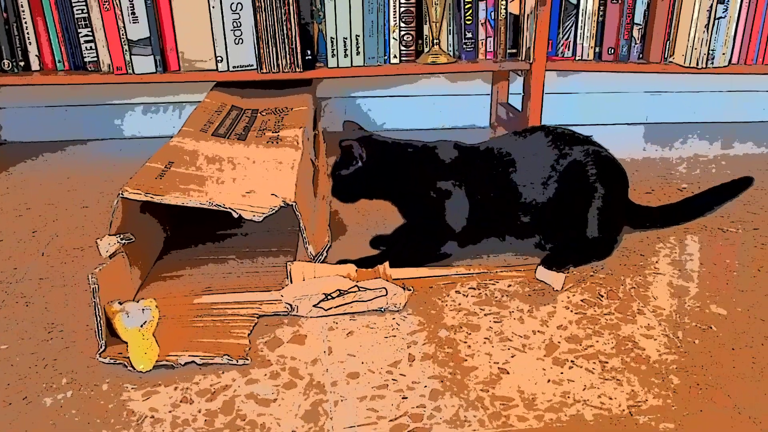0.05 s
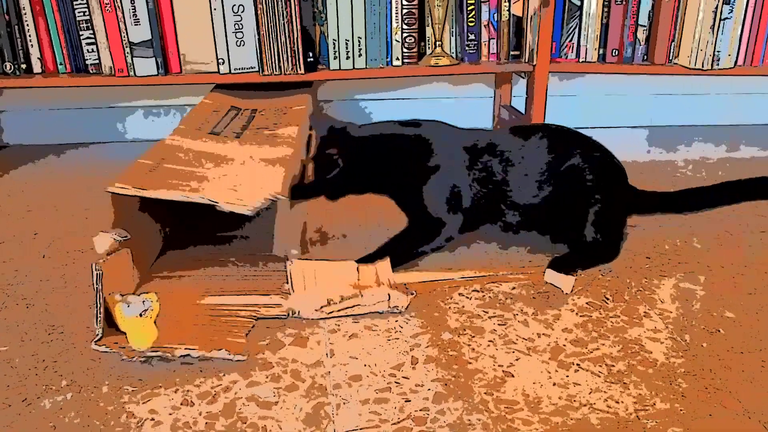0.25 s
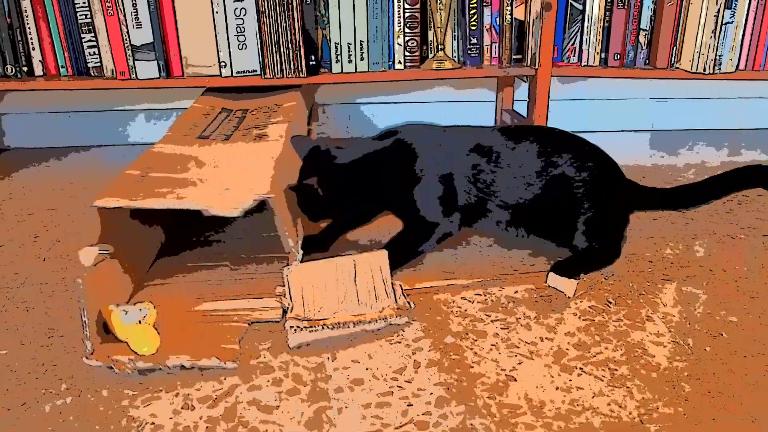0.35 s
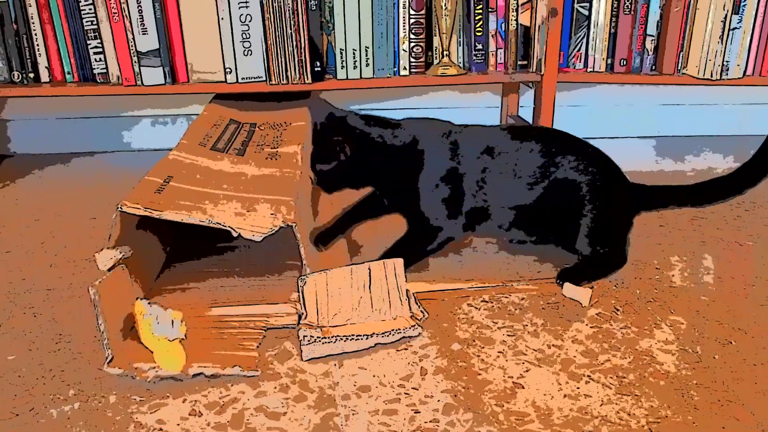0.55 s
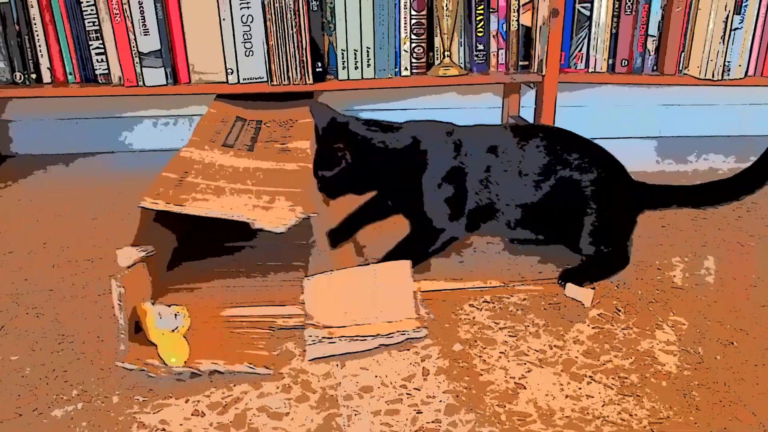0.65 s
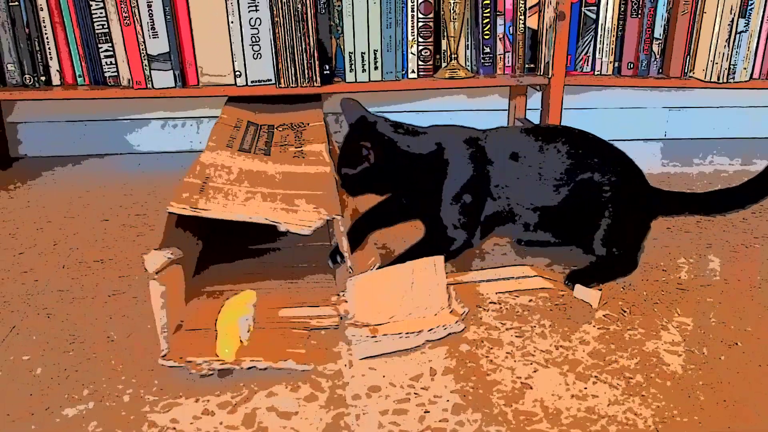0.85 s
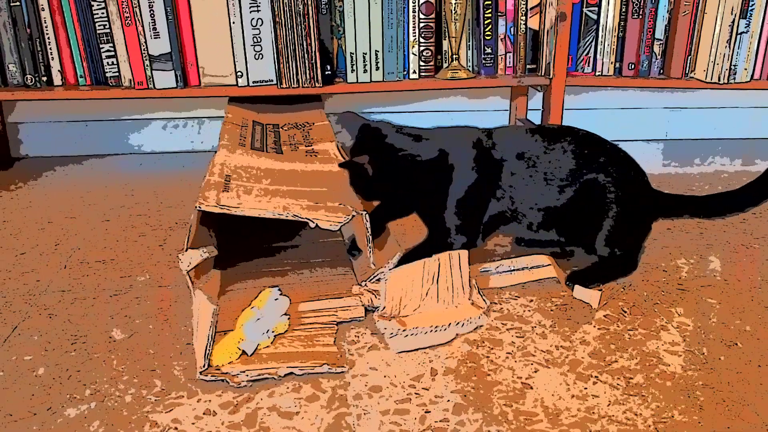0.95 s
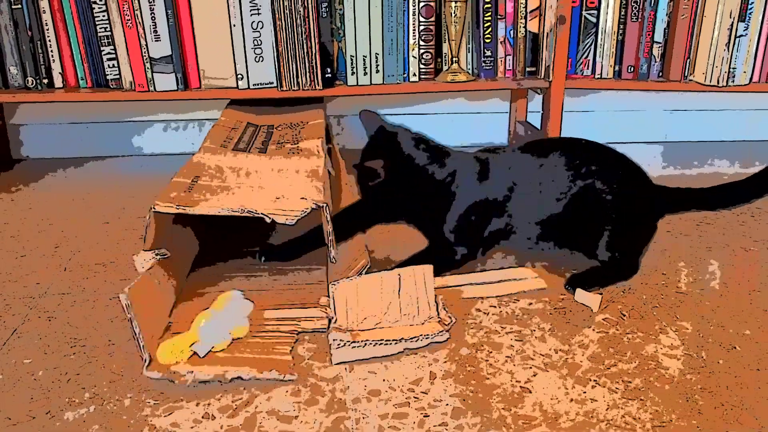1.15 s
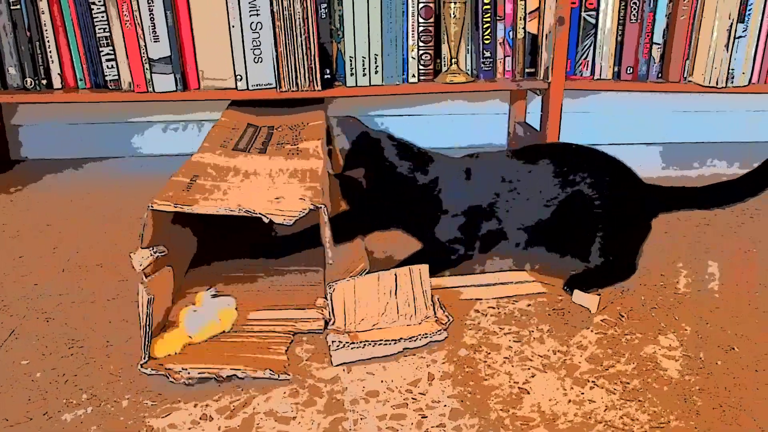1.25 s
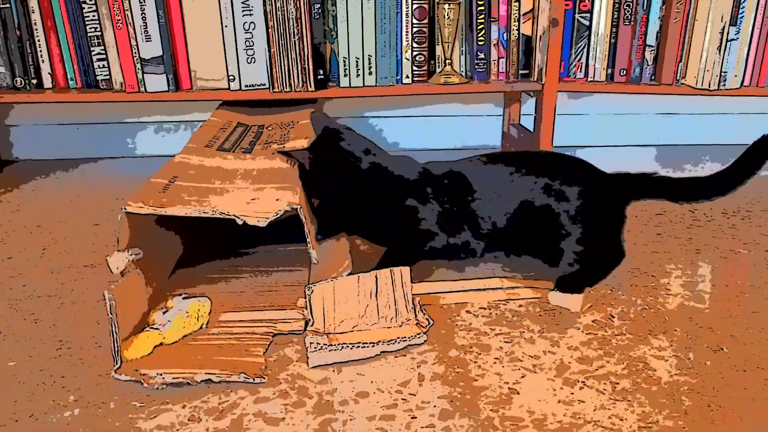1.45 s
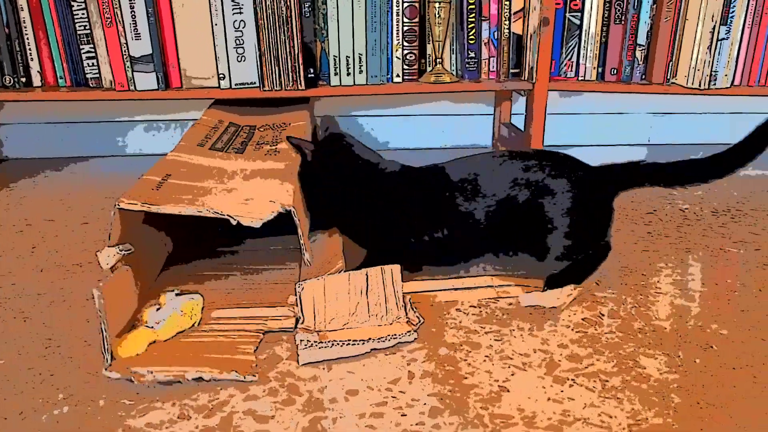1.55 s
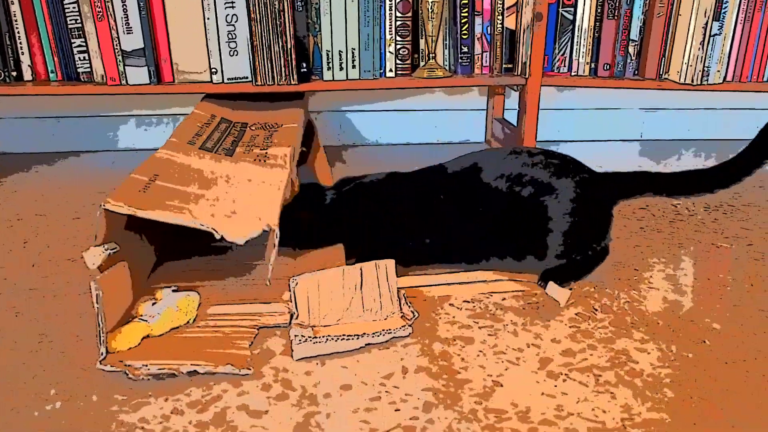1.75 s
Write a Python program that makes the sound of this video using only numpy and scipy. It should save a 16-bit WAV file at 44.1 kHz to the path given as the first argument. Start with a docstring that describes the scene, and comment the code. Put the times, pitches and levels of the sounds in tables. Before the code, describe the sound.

Cardboard scrapes and crackles as a cat shoulders into a box. Sharp snaps and crinkling come first, then hollow bumps, a loud flap clack and lighter scratching, heard close by in a small carpeted room with a faint hum.

```python
"""A small carpeted room, where a cat shoulders into a cardboard box.
Fur and cardboard scrape, the box drags, and a crease gives in sharp snaps and fine crinkling.
Paws and shoulders bump the hollow box, the floor thuds, flaps spring back with a clack,
and paw strokes make the cardboard sing. Under it all lie a low hum and the air of the room."""
import sys
import numpy as np
from scipy import signal
from scipy.fft import rfft, irfft, next_fast_len
from scipy.io import wavfile
from scipy.ndimage import uniform_filter1d, map_coordinates

SR = 44100
rng = np.random.default_rng(int(sys.argv[2]) if len(sys.argv) > 2 else 0)


def transcribe(u):
    """Save the signal u as a 16-bit wav file named by the first command-line argument.

    u: samples, shape (n,) or (channels, n), limited to [-1, 1]; the rate is SR.
    q: integer samples, one column per channel.
    """
    v = np.clip(np.atleast_2d(u).T, -1, 1)
    q = np.round(v * 32767).astype(np.int16)
    wavfile.write(sys.argv[1], SR, q)


N = 79380
T = np.arange(N) / SR


def amp(db):
    """Decibels to gain."""
    return 10 ** (np.asarray(db) / 20)


def unit(x):
    """Scale to rms 1."""
    return x / np.sqrt(np.mean(x ** 2) + 1e-20)


def along(points, hz):
    """(f/Hz, value) points read on a log axis."""
    f, v = np.transpose(points)
    return np.interp(np.log(hz + 1), np.log(f + 1), v)


def level(points):
    """Gain per sample from (t/s, level/dB) points."""
    return amp(np.interp(T, *np.transpose(points)))


def wobble(knots_per_s):
    """Smooth random curve."""
    return map_coordinates(rng.standard_normal(int(N * knots_per_s / SR) + 4), [T * knots_per_s])


def white():
    """Two independent noises."""
    return rng.standard_normal((2, N))


def grains(per_s, spread_db):
    """Impulses of uneven size at random times."""
    sizes = amp(spread_db * np.clip(white(), -2, 2)) * np.sign(white())
    return unit(sizes * (rng.random((2, N)) < per_s / SR))


def filtered(x, response):
    """Apply a frequency response."""
    m = next_fast_len(N + SR // 2)
    return irfft(rfft(x, m) * response(np.fft.rfftfreq(m, 1 / SR)), m)[..., :N]


# left-right likeness: f/Hz, correlation
COHERENCE = [(60, 0.97), (200, 0.98), (550, 0.93), (1600, 0.67), (5000, 0.31), (9000, 0.28), (15000, 0.068)]


def stereo(pair):
    """Two independent signals to left and right: bass alike, treble less so."""
    angle = lambda hz: np.arccos(np.clip(along(COHERENCE, hz), -1, 1)) / 2
    mid, side = filtered(pair, lambda hz: np.array([np.cos(angle(hz)), np.sin(angle(hz))]))
    return np.array([mid + side, mid - side])


def coloured(pair, spectrum):
    """Stereo signal of rms 1, shaped by (f/Hz, density/dB) points."""
    return unit(stereo(filtered(pair, lambda hz: amp(along(spectrum, hz)))))


def resonant(modes, steady_s):
    """Noise in (f/Hz, width/Hz, level/dB) resonances, levelled to rms 1 over steady_s."""
    def response(f):
        power = sum(amp(2 * db) / (1 + ((f - hz) / (width / 2)) ** 2) ** 1.4 for hz, width, db in modes)
        return np.sqrt(power) * f / (f + 30)
    x = stereo(filtered(white(), response))
    local_power = uniform_filter1d(np.mean(x ** 2, axis=0), int(steady_s * SR))
    return x / np.sqrt(np.abs(local_power) + 1e-12)


def blow(start_s, t60_s, rise_s=0.0025):
    """Impact envelope: quick rise, exponential decay."""
    t = np.maximum(T - start_s, 0)
    return (1 - np.exp(-t / rise_s)) * amp(-60 * t / t60_s)


# hum envelope: t/s, level/dB
HUM_LEVEL = [(0, -50.5), (.1, -41.5), (.25, -37), (.45, -55), (.7, -49), (1.8, -50)]
# room air: f/Hz, density/dB
AIR_SPECTRUM = [(20, -28), (45, 1.5), (90, -6), (170, 0.5), (280, -17.5), (400, -11), (850, -18.5),
                (2000, -26.5), (5000, -39), (9000, -58), (16000, -45.5)]


def background(hum_hz=47, waver_db=2, air_db=-46):
    """A low hum wavering in phase and level, over steady room air."""
    tone = np.sqrt(2) * np.sin(2 * np.pi * hum_hz * T + 0.82 * wobble(4.07))
    hum = tone * level(HUM_LEVEL) * amp(-waver_db * wobble(4.3))
    return hum + amp(air_db) * coloured(white(), AIR_SPECTRUM)


# box on carpet: t/s, level/dB
DRAG_LEVEL = [(.18, -105), (.22, -41.5), (.6, -39.5), (.7, -43), (.83, -41.5), (.95, -38.5), (1.03, -43),
              (1.2, -38), (1.4, -42.5), (1.55, -41.5), (1.8, -47.5)]
# its rumble: f/Hz, density/dB
DRAG_SPECTRUM = [(35, -10), (70, -4.5), (115, -1), (165, 1), (215, -7.5), (270, -4), (340, -11.5),
                 (530, -8), (800, -24.5), (2000, -47)]


def drag():
    """The box rumbles as it slides on the carpet."""
    return level(DRAG_LEVEL) * coloured(white(), DRAG_SPECTRUM)


# fur on cardboard: t/s, level/dB
SCRAPE_LEVEL = [(.188, -58), (.196, -33), (.225, -35), (.265, -30), (.31, -40), (.39, -32), (.438, -39.5),
                (.462, -28.5), (.49, -34), (.52, -39.5), (.56, -36), (.65, -44), (.68, -36), (.72, -37.5),
                (.76, -37), (.865, -38), (.89, -38.5), (.96, -38.5), (.99, -33.5), (1.04, -42.5),
                (1.07, -36), (1.135, -36.5), (1.19, -41), (1.26, -44), (1.33, -37), (1.365, -40.5),
                (1.415, -44.5), (1.455, -43.5), (1.478, -41), (1.52, -36.5), (1.55, -44), (1.61, -47),
                (1.675, -40), (1.72, -42), (1.8, -44.5)]
# its friction noise: f/Hz, density/dB
SCRAPE_SPECTRUM = [(200, -17), (500, -9.5), (1000, 0), (1700, -6.5), (2600, -3), (4000, -0.5), (5500, 0),
                   (8000, -5), (12000, -8.5), (16000, -16)]


def scrape(slip_share=0.29, flutter_db=1):
    """Fur on cardboard: smooth rubbing mixed with tiny slips."""
    rubbing = np.sqrt(1 - slip_share) * white()
    slips = np.sqrt(slip_share) * grains(per_s=1500, spread_db=4)
    flutter = amp(flutter_db * wobble(120))
    return level(SCRAPE_LEVEL) * flutter * coloured(rubbing + slips, SCRAPE_SPECTRUM)


# crease breaks: t/s, level/dB, f/Hz
CREASE_SNAPS = [(0.1942, -18, 4350), (.2294, -20, 5500), (.2444, -10, 4750), (0.2772, -2.5, 4390),
                (.2887, -3.5, 5600), (0.303, 0, 5170), (.3166, -19, 4850), (0.321, -21, 2800),
                (.3648, -21, 4140), (0.374, -21, 3930), (0.446, -21, 4560), (0.45, -20.5, 4000),
                (0.486, -21, 5100), (0.6103, -26.5, 8740), (.666, -26, 4270), (.8825, -22, 5330),
                (.886, -24.5, 4730), (.889, -24, 2600), (0.9854, -32, 4930), (0.992, -30, 4880),
                (1.3205, -22.5, 4220), (1.509, -17.5, 3660), (1.7033, -30.5, 11100)]
# their grit: f/Hz, density/dB
SNAP_SPECTRUM = [(300, -8), (1500, -8), (2300, 8), (3300, 7), (9000, 5.5), (16000, -6)]


def snaps(rise_s=0.000088, ring_s=0.00079, overtone_db=-8, grit_db=-9.5, grit_s=0.0014):
    """Each break of the crease rings for a few cycles, with a spit of grit."""
    out = np.zeros((2, N))
    grit = amp(grit_db) * coloured(white(), SNAP_SPECTRUM)
    for start_s, db, hz in CREASE_SNAPS:
        t = np.maximum(T - start_s, 0)
        phase = 2 * np.pi * hz * t
        ring = np.sin(phase) + amp(overtone_db) * np.sin(1.9 * phase)
        burst = ring * np.exp(-(t / ring_s) ** 2) + grit * np.exp(-t / grit_s)
        out += amp(db) * (1 - np.exp(-t / rise_s)) * burst
    return out


# paper skin crinkling: t/s, length/s, level/dB
SKIN_CRINKLES = [(.203, .07, -41), (0.298, 0.091, -29), (0.476, 0.05, -39), (.695, 0.075, -41),
                 (0.936, 0.027, -45), (0.984, .022, -37.5)]
# fibre breaks: f/Hz, density/dB
FIBRE_SPECTRUM = [(2000, -34), (5000, -1), (7500, -6), (9500, 2.5), (12500, -5), (16000, -13)]


def crinkles():
    """Swarms of bright fibre breaks swell fast and die away."""
    swell = 0
    for start_s, length_s, db in SKIN_CRINKLES:
        progress = np.clip((T - start_s) / length_s, 0, 1)
        swell += amp(db) * np.sin(np.pi * np.sqrt(progress))
    return swell * coloured(grains(per_s=3300, spread_db=2.5), FIBRE_SPECTRUM)


# paws and shoulders on the box: t/s, cavity level/dB, panel level/dB
BOX_BUMPS = [(.207, -29.5, -26), (0.27, -34.5, -33), (0.374, -28.5, -35), (0.397, -22.5, -21.5),
             (0.4547, -28.5, -20.5), (0.48, -25.5, -26.5), (0.51, -38, -33), (0.539, -26.5, -36),
             (0.553, -35, -36), (0.592, -36, -34), (0.647, -35, -48), (0.885, -38, -39.5),
             (1.089, -34, -62), (1.139, -36, -32.5), (1.194, -38, -46), (1.309, -36.5, -43),
             (1.349, -33.5, -42.5), (1.492, -38, -33.5), (1.524, -37, -44), (1.568, -32, -55)]
# air in the box: f/Hz, width/Hz, level/dB
CAVITY_MODES = [(124.5, 15, -2.5), (159.7, 8.4, 1.5), (200.7, 20, 2), (254.5, 22, -5)]
# box panels: f/Hz, width/Hz, level/dB
PANEL_MODES = [(313, 61, -4.5), (388, 38, 0), (422.5, 30, 1.5), (496, 41, -4), (541.5, 28, -0.5),
               (608, 43, -3), (679, 20, 1), (820, 210, -13.5), (1060, 63, -13)]


def bumps(cavity_t60_s=0.25, panel_t60_s=0.29):
    """Soft blows set the air in the box booming and its panels drumming."""
    boom = np.sqrt(sum((amp(db) * blow(s, cavity_t60_s)) ** 2 for s, db, _ in BOX_BUMPS))
    drum = np.sqrt(sum((amp(db) * blow(s, panel_t60_s)) ** 2 for s, _, db in BOX_BUMPS))
    return boom * resonant(CAVITY_MODES, steady_s=0.0245) + drum * resonant(PANEL_MODES, steady_s=0.025)


# weight landing: t/s, level/dB
FLOOR_THUDS = [(.272, -39.5), (.456, -29), (0.533, -33.5), (0.584, -32), (0.676, -33.5), (1.313, -33),
               (1.491, -34.5)]
# floor: f/Hz, level/dB
FLOOR_MODES = [(75, 0.5), (112, 1)]


def thuds(t60_s=0.31):
    """The floor gives a short dull note under each shift of weight."""
    return sum(amp(db + mode_db) * np.sin(2 * np.pi * hz * (T - start_s)) * blow(start_s, t60_s)
               for start_s, db in FLOOR_THUDS for hz, mode_db in FLOOR_MODES)


# flaps striking the box: t/s, level/dB, shiver level/dB, tilt/(dB/octave)
FLAP_HITS = [(0.455, -26, -52, -4), (0.5962, -24, -49.5, -3), (0.8853, -33, -49, -7),
             (1.1421, -12.5, -34, -3.5), (1.143, -10, -37, 5), (1.156, -21, -41, -8.5),
             (1.198, -24, -46, 0), (1.1996, -17.5, -47, -1), (1.3202, -24.5, -45, 0),
             (1.332, -27, -47.5, 2.5), (1.509, -27, -47, 6), (1.521, -35, -60, 8)]
# flap: f/Hz, width/Hz, level/dB
FLAP_MODES = [(603, 100, -14), (1080, 90, 0), (1422, 78, 1.5), (1800, 190, 4), (2010, 92, 2.5),
              (2480, 120, 3), (2780, 140, 2.5), (3340, 560, -6.5), (4140, 400, -27), (5050, 600, -13.5),
              (8400, 1500, -11)]
# contact grit: f/Hz, density/dB
CLACK_SPECTRUM = [(300, -9), (1000, 0), (3000, 8), (9000, -5), (16000, -20)]


def clacks(rise_s=0.00008, grit_s=0.0015, pivot_hz=2000):
    """A flap hits: its modes sound for a moment and the panel shivers on, the low modes longest."""
    out = np.zeros((2, N))
    grit = amp(0.5) * coloured(white(), CLACK_SPECTRUM)
    power = sum(amp(2 * db) * width for _, width, db in FLAP_MODES)

    def weight(hz, width, db, tilt):
        return amp(db + tilt * np.log2(hz / pivot_hz)) * np.sqrt(width / power)

    for start_s, db, _, tilt in FLAP_HITS:
        t = np.maximum(T - start_s, 0)
        ring = sum(weight(hz, width, mode_db, tilt) * np.cos(2 * np.pi * hz * t)
                   * np.exp(-np.pi * width * t) for hz, width, mode_db in FLAP_MODES)
        contact = amp(0.3 * db) * grit * np.exp(-t / grit_s)  # soft contacts lose their grit
        out += amp(db) * (1 - np.exp(-t / rise_s)) * (1.01 * ring + contact)
    for hz, width, mode_db in FLAP_MODES:
        t60_s = 0.43 * np.sqrt(1400 / hz)
        shivers = [weight(hz, width, mode_db + db, tilt) * blow(start_s, t60_s, rise_s=0.00064)
                   for start_s, _, db, tilt in FLAP_HITS]
        out += np.linalg.norm(shivers, axis=0) * resonant([(hz, width, mode_db)], steady_s=0.04)
    return out


# paw on cardboard: t/s, length/s, level/dB, f/Hz
PAW_STROKES = [(0.59, 0.076, -40, 1034), (0.661, 0.078, -40, 3800), (.765, 0.056, -48, 5330),
               (0.917, 0.038, -40.5, 3300), (1.062, 0.018, -38.5, 5330), (1.092, 0.043, -40.5, 4530),
               (1.319, 0.022, -36.5, 3800), (1.425, 0.045, -44, 3660), (1.505, 0.036, -41.5, 2830),
               (1.635, 0.085, -44.5, 3280)]


def strokes(q=6.1):
    """Each paw stroke swells and fades in one broad resonance of the cardboard."""
    out = np.zeros((2, N))
    for start_s, length_s, db, hz in PAW_STROKES:
        progress = np.clip((T - start_s) / length_s, 0, 1)
        swell = np.sqrt(np.abs(np.sin(np.pi * progress)))
        out += amp(db) * swell * resonant([(hz, hz / q, 0)], steady_s=0.015)
    return out


# room decay: f/Hz, T60/s
ROOM_DECAY = [(200, 1), (2000, 0.39), (6000, 0.08), (14000, 0.26)]


def room(x, build_s=0.0016):
    """Short reverberation of a furnished room, longest in the bass."""
    hz, t, noise = signal.stft(rng.standard_normal((2, SR // 2)), SR, nperseg=256)
    decay = amp(-60 * t / along(ROOM_DECAY, hz)[:, None])
    _, tail = signal.istft(noise * decay, SR, nperseg=256)
    tail *= 1 - np.exp(-np.arange(tail.shape[1]) / SR / build_s)
    tail /= np.linalg.norm(tail[0])
    return stereo(signal.fftconvolve(x.mean(axis=0)[None], tail, axes=1)[:, :N])


def scene(room_db=-7):
    """All sources summed; only snaps and clacks reverberate."""
    sharp = snaps() + clacks()
    dull = (bumps() + thuds()) * amp([[0.4], [-0.4]])  # slightly left
    reverb = amp(room_db) * room(sharp)
    return sharp + reverb + dull + scrape() + drag() + strokes() + crinkles() + background()


# microphone dips: f/Hz, half-width/Hz, gain/dB
TREBLE_DIPS = [(6620, 347, -9), (10450, 465, -9)]


def record(dry, ceiling=1.1, top_hz=15900):
    """The microphone dips twice in the treble, rounds off peaks and limits the band."""
    dips = lambda f: amp(sum(db / (1 + ((f - hz) / width) ** 4) for hz, width, db in TREBLE_DIPS))
    x = filtered(dry, dips)
    rounded = x / (1 + np.abs(x / ceiling) ** 8) ** (1 / 8)
    return filtered(rounded, lambda hz: hz < top_hz)


dry = scene()
out = record(dry)
transcribe(out)
```